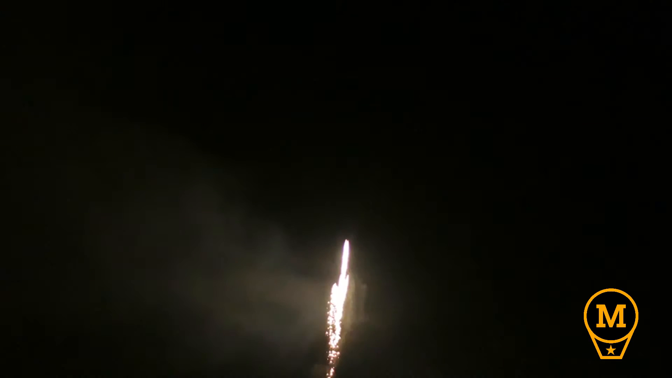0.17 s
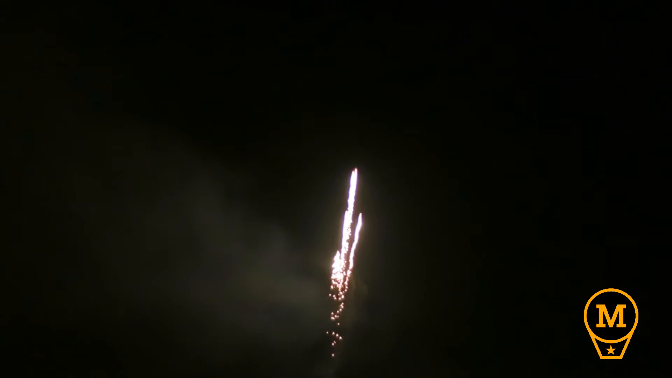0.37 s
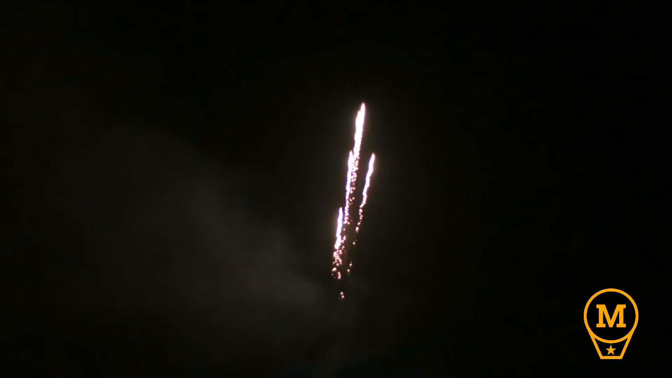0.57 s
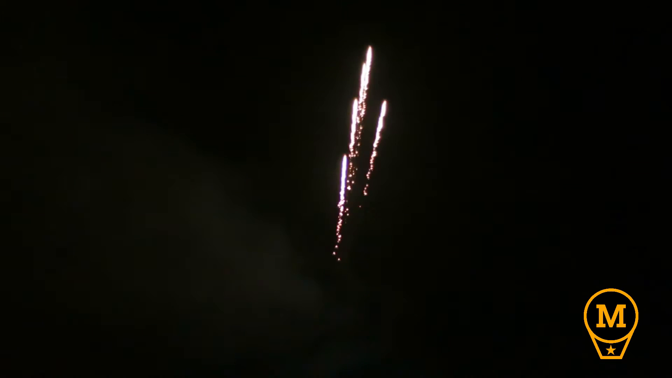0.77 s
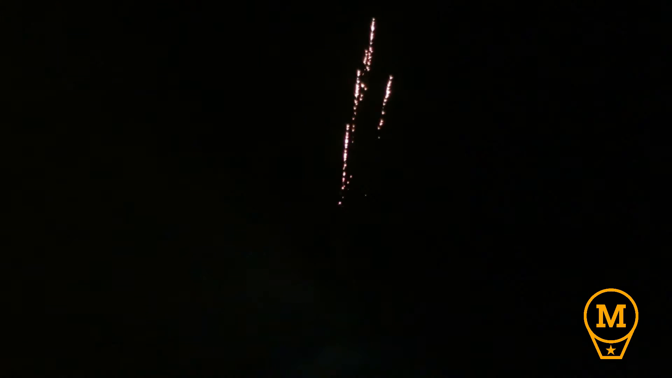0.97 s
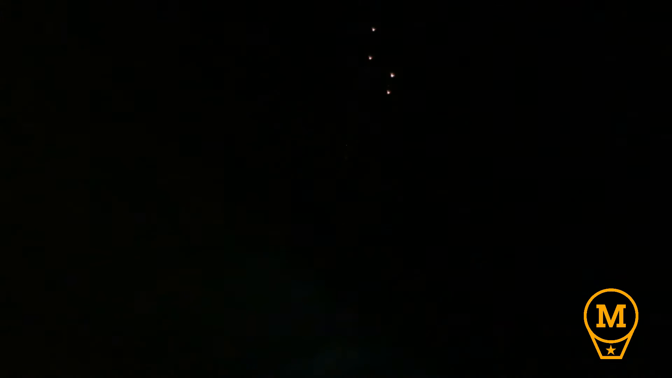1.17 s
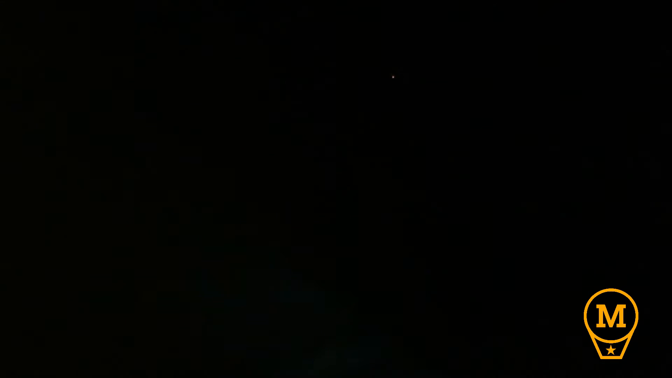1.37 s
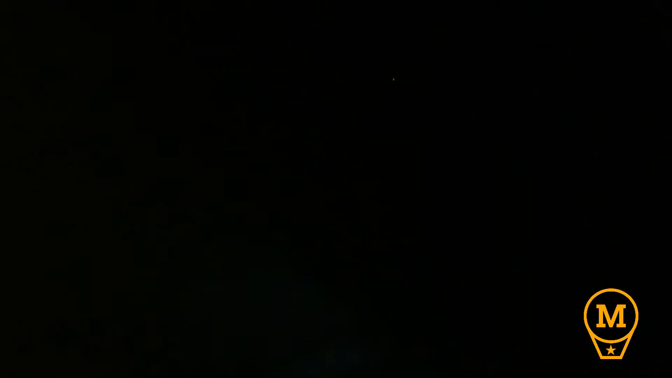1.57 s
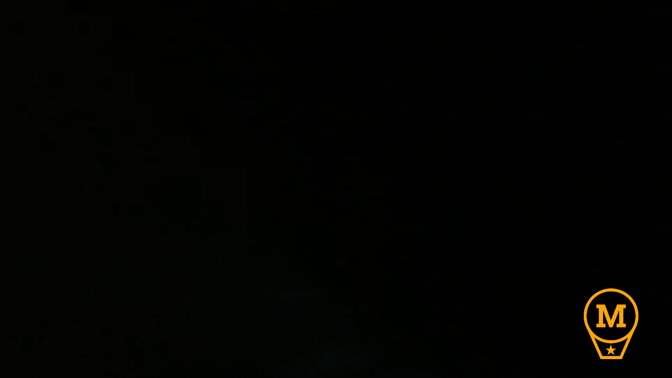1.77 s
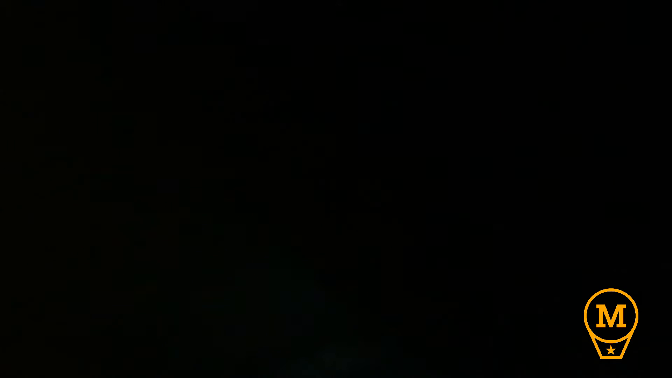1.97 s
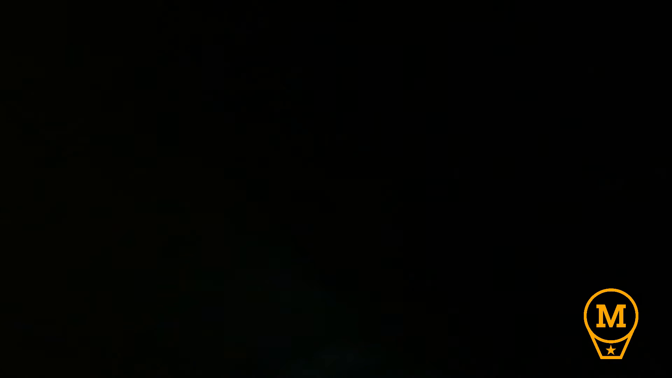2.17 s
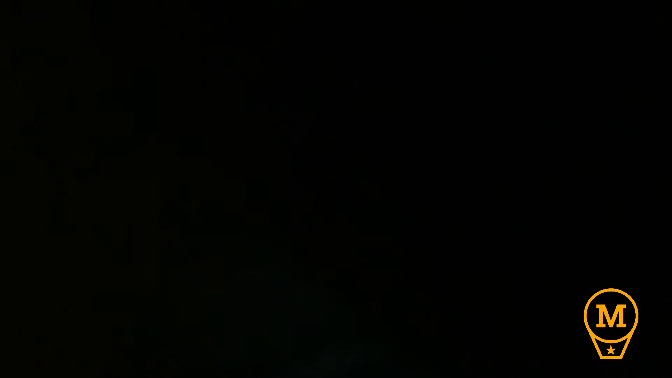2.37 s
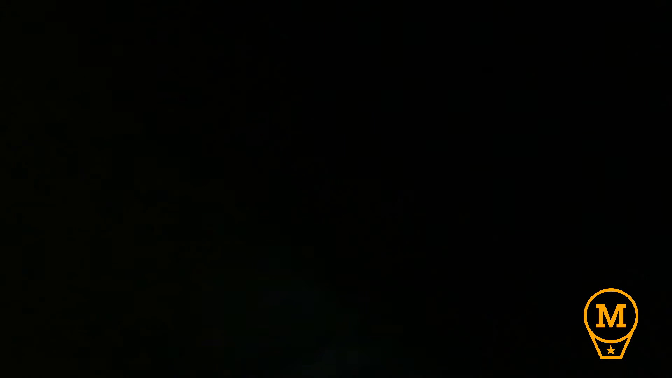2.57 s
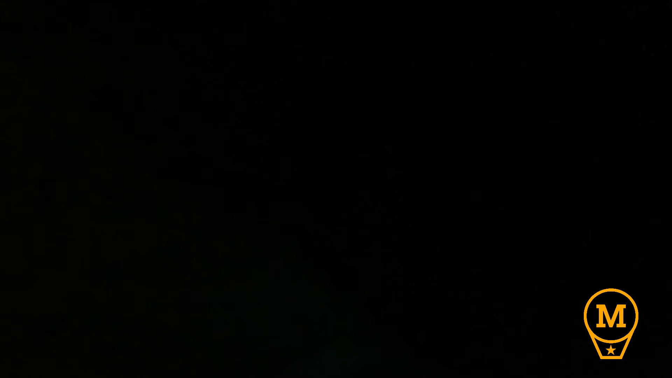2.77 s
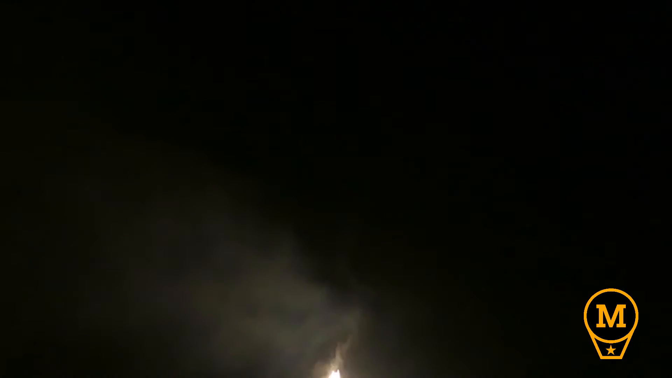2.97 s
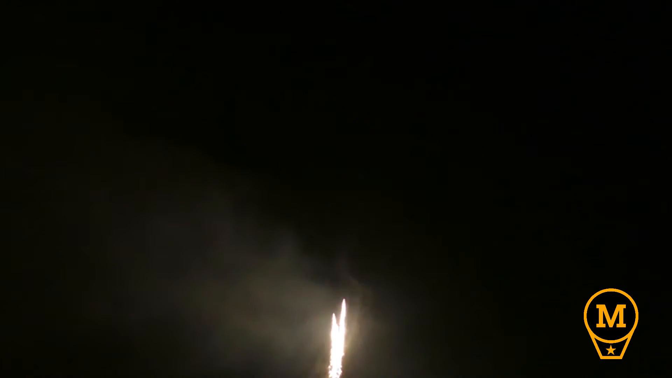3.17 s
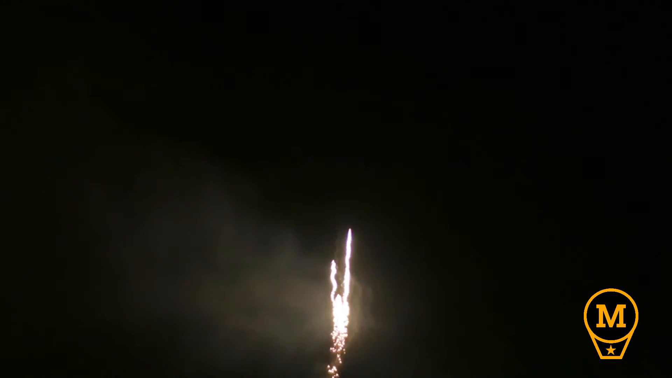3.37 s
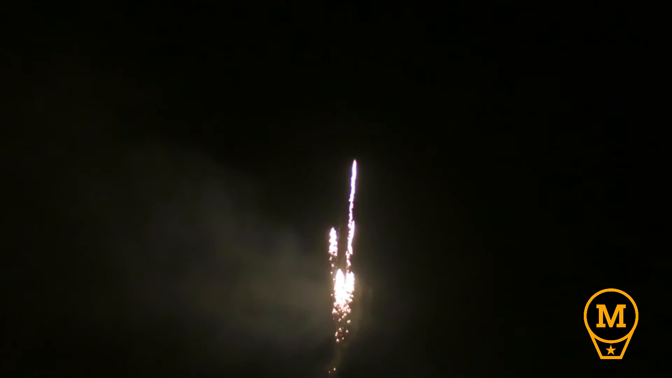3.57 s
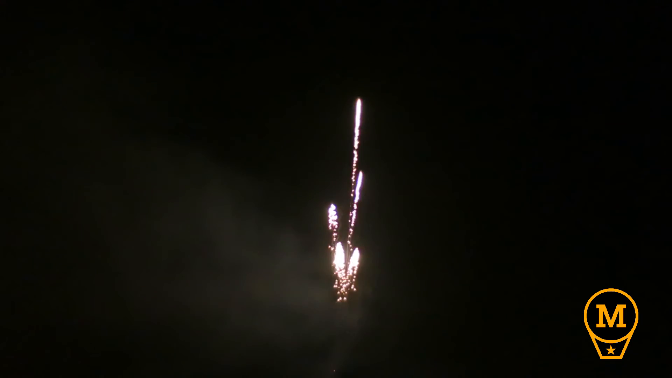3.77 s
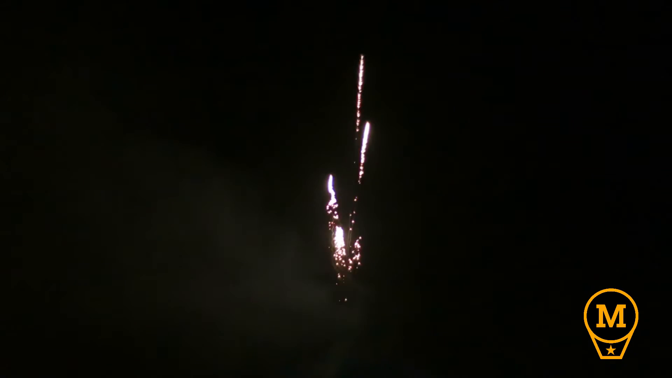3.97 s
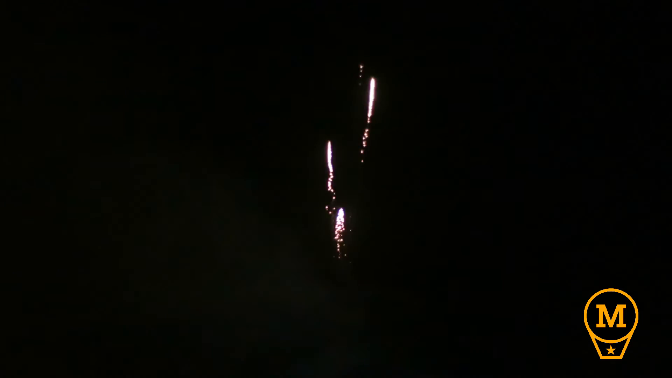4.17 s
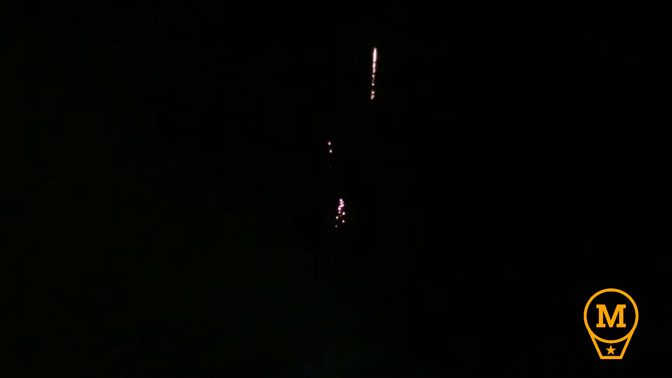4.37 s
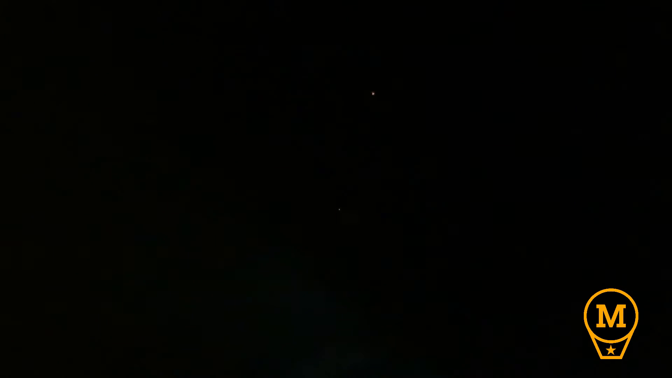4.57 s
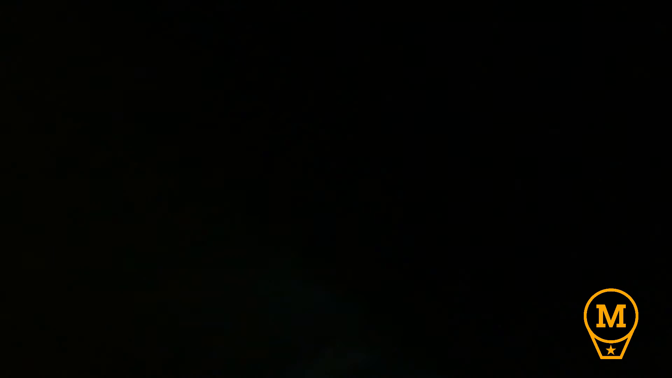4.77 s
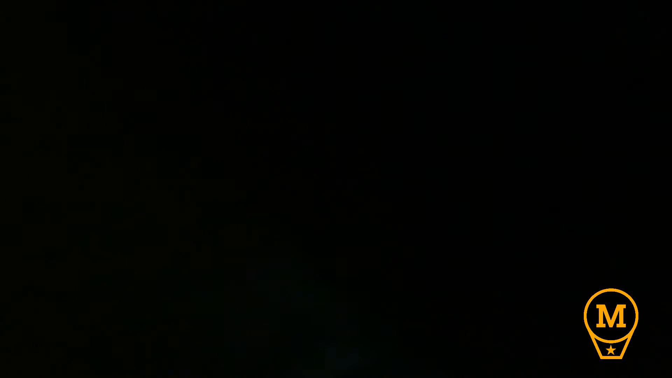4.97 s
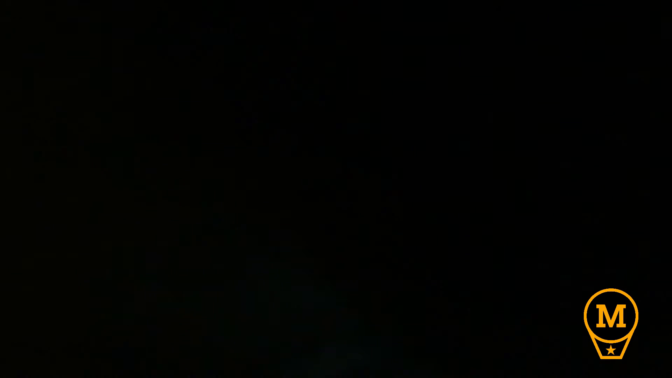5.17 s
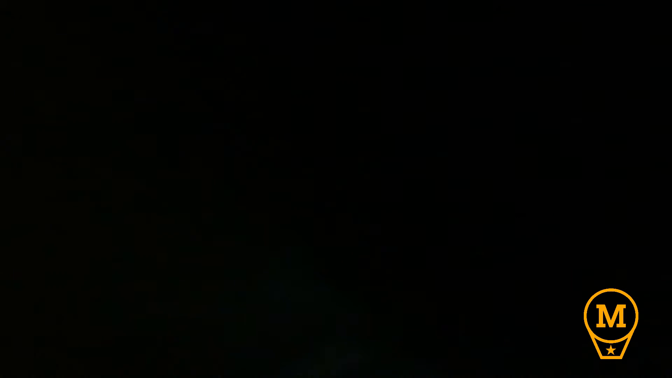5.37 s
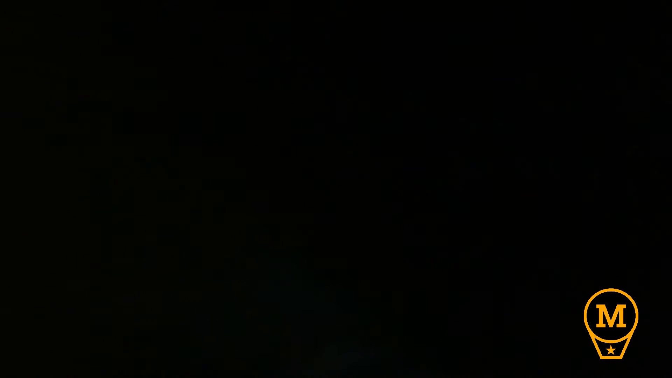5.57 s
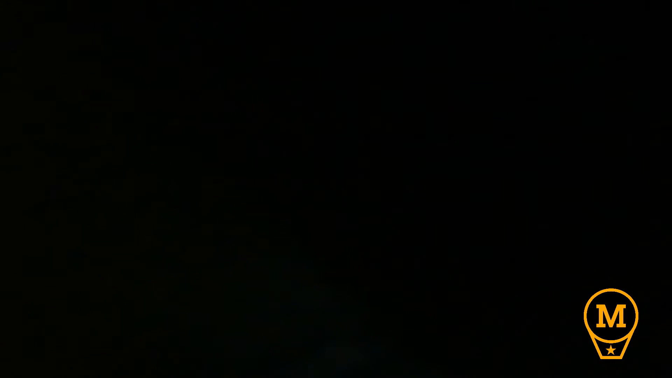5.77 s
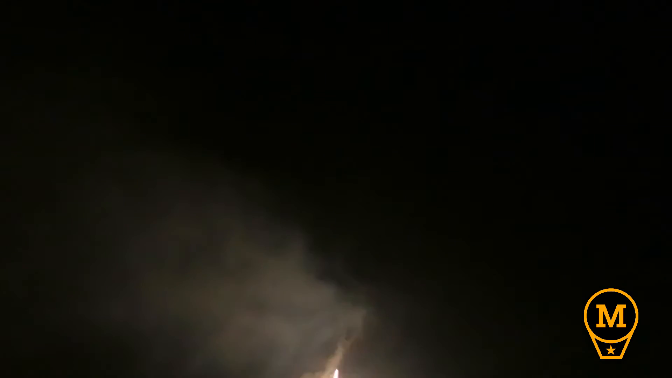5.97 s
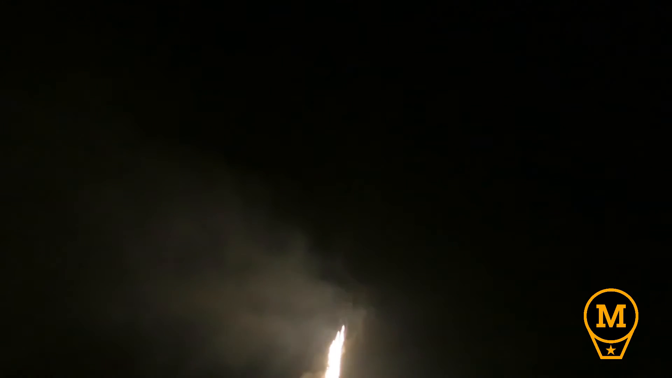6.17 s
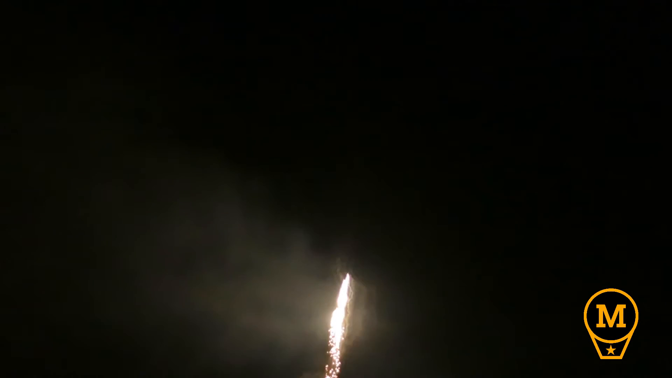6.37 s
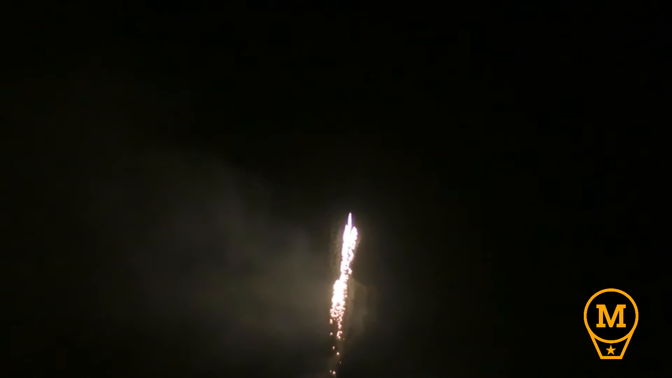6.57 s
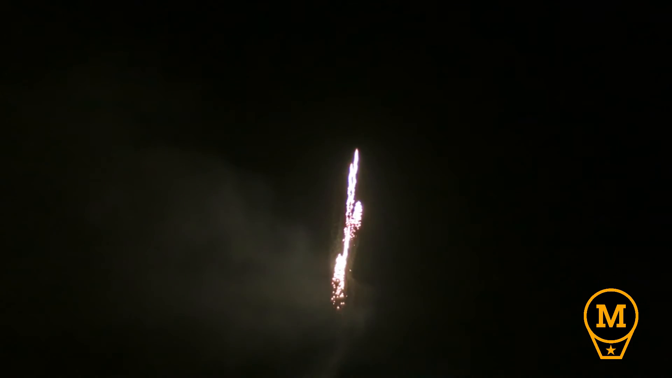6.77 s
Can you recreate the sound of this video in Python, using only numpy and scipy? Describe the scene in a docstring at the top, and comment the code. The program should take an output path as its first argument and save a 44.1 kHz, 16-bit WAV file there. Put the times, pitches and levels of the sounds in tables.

```python
"""Night fireworks: a town rumbles under a thin whine near 15.7 kHz, and far salutes thud and come back off a
wall. Three launches follow, about three seconds apart: shaped-noise blasts pop from a tube, then whistling
stars, built from spinning tones and hiss, climb away. Near walls slap back, houses hold the whistle's echo, and
the first two launches get a late knock off a slope; the background dips at each and slowly swells back. Small
ticks come in between; near the end a faint low sine climbs into a blip."""
import sys
import numpy as np
from scipy import signal
from scipy.fft import rfft, irfft
from scipy.io import wavfile
from scipy.ndimage import uniform_filter1d

SR = 44100
rng = np.random.default_rng(int(sys.argv[2]) if len(sys.argv) > 2 else 0)


def file_out(sig):
    """Save sig as 16-bit WAV at sys.argv[1]."""
    # one column per channel
    cols = np.atleast_2d(sig).T
    # limit, then scale
    lim = np.clip(cols, -1, 1)
    pcm = np.round(lim * 32767).astype(np.int16)
    wavfile.write(sys.argv[1], SR, pcm)


N = 300028
T = np.arange(N) / SR
LEFT_RIGHT = np.array([[1], [-1]])  # sends a side signal to left and, inverted, to right

# Colour of the town rumble: (frequency [Hz], relative level [dB])
TOWN_COLOUR = [(15, -39), (25, -18), (52, -8.5), (72, 2), (90, -7.5), (150, -9), (230, -9.5), (400, -14),
               (531, -20), (887, -19), (1100, -24.5), (2480, -31), (4000, -37.5), (8000, -44),
               (14800, -51.5), (18000, -53)]
# Background dip at each launch: (time [s], depth before the return sets in [dB], swell-back time constant [s])
LAUNCH_DIPS = [(.17, -17.5, 1.27), (3.2, -10.5, 1.72), (6.33, -13, 1.1)]
# Far salutes: (time [s], level [dB], pitch [Hz])
SALUTES = [(0.0707, -5, 322), (0.362, -25, 314), (3.122, -5, 300), (4.351, -12, 282), (5.524, -7, 283),
           (6.546, -22.5, 287)]
# Colour of the rough wall's return: (frequency [Hz], relative level [dB])
WALL_COLOUR = [(100, 6.5), (350, 0), (900, -5), (4000, -9)]
# Launch blasts, several per launch: (time [s], push level [dB], crack re push [dB], rattle re push [dB])
LAUNCH_BLASTS = [(0.1668, -9.5, 0, -12.5), (0.1696, 3.5, -17, -23.5), (0.1737, 2, -20, -25),
                 (.175, 1.5, 1.5, -20.5), (0.1811, -13, 8, -14), (3.213, -8, 3, -13.5),
                 (3.2156, 3, -3.5, -11), (3.222, -5.5, 5, -25), (3.245, -24, 1, -12.5),
                 (6.32, 2.5, -2.5, -14.5), (6.334, -13, 2.5, -10), (6.336, -9, -3.5, -3)]
# Colour of a blast's low push: (frequency [Hz], relative level [dB])
PUSH_COLOUR = [(35, -54), (60, -6.5), (300, 3.5), (750, 0.5), (1000, -3), (1580, -20.5), (2050, -16),
               (4400, -24), (16000, -71)]
# Colour of a blast's sharp crack: (frequency [Hz], relative level [dB])
CRACK_COLOUR = [(600, -20.5), (1600, 1), (2050, -8.5), (3500, 1.5), (4420, -8), (7940, -18.5), (13000, -30),
                (16000, -106)]
# Whistling stars: (lit [s], turn [s], out [s], pitch when lit [Hz], pitch at the turn [Hz], pitch when out [Hz],
# time constant of the first drop [s], sag [Hz/s], level at the turn [dB], growth [dB/s], spin [turns/s],
# spin depth [Hz], half-pitch tone [dB], overtone trim [dB], left minus right [dB])
WHISTLING_STARS = [(.192, 1.07, 1.413, 4520, 3032, 3327, 0.054, 880, -23, 4.5, 32.6, 33, -24.5, 2, -1),
                   (.24, .5, .64, 3800, 3247, 3040, .05, 1300, -29.5, -2, 28, 80, -22, -1, -1),
                   (.58, 1.1, 1.28, 3590, 3630, 3660, .07, -250, -25.5, 7, 21, 20, -21, 3, -1.5),
                   (.6, 1.08, 1.3, 3557, 3190, 3357, 0.074, 603, -23.5, 3.5, 29.4, 13.5, -44, 8.5, 0),
                   (3.232, 4.43, 4.8, 4406, 2970, 3273, .12, 690, -17, 5.5, 27.7, 38.5, -18.5, -3, -0.8),
                   (3.26, 4.1, 4.24, 3742, 2810, 2805, 0.096, 580, -19.5, 4, 23.8, 53, -27, -4.5, -0.5),
                   (3.28, 4.07, 4.38, 4250, 3313, 3710, .07, 800.5, -24.5, 8, 31.5, 33, -41, 4, -.5),
                   (3.3, 4.05, 4.37, 3780, 3114, 3356, .07, 620, -19.5, 8, 33, 36, -37, 3, -1),
                   (4.26, 4.4, 4.75, 3180, 3061, 3370, 0.0664, 697, -19.5, 3, 29.77, 7.2, -42, -3.5, -1),
                   (6.332, 6.9, 7.2, 4466, 3486, 3700, 0.041, 299, -19, 1.5, 27.3, 26, -38, -1.5, -0.5),
                   (6.35, 6.9, 7.2, 3782, 2994, 3200, .06, 721.5, -20, -1, 35.6, 54, -28.5, -0.5, -1),
                   (6.38, 6.9, 7.2, 4266, 3146, 3300, 0.073, 1500, -20, 16, 28, 19, -35, 6.5, -1)]
# Flame sputters, where pitch jumps up and slides back; star row number from 0: (time [s], jump [Hz])
FLAME_SPUTTERS = {2: [(.655, 397), (.805, 354), (.905, 199)], 6: [(3.508, 349), (3.8, 196), (3.838, 197)],
                  11: [(6.665, 397)]}
# Overtones of the whistle: (multiple of the pitch, level before trim [dB])
WHISTLE_OVERTONES = [(2, -19), (3, -22), (4, -37.5)]
# Colour of the flame's hiss: (frequency [Hz], relative level [dB])
HISS_COLOUR = [(700, -10.5), (2200, -4), (3400, 16.5), (4500, -6.0), (6500, -7), (11000, -8.5), (15000, -27)]
# Slap-backs of the blasts off near walls: (time [s], nominal level [dB], centre [Hz])
WALL_SLAPS = [(.209, -21, 1100), (.216, -14, 2150), (.25, -20.5, 330), (.27, -23, 1830), (.281, -21, 292),
              (3.257, -14, 1980), (3.28, -23, 1500), (3.325, -22, 503), (6.345, -28, 400),
              (6.355, -23, 1000), (6.37, -10, 1910), (6.43, -19, 496)]
# Short ticks between launches: (time [s], nominal level [dB], centre [Hz])
SHORT_TICKS = [(1.145, -35, 1360), (2.345, -47, 5900), (2.497, -41, 6040)]
# Faint climbing tone with a blip at its end: (time [s], pitch [Hz], level [dB])
CLIMBING_TONE = [(5.841, 284, -41), (5.899, 296, -39), (6.019, 332, -38.5), (6.151, 366, -42),
                 (6.21, 391, -56), (6.25, 388, -26), (6.29, 350, -40)]

# A far slope returns a launch as a soft knock: delay [s], nominal level [dB], centre [Hz]
SLOPE_S, SLOPE_DB, SLOPE_HZ = 1.88, -36.5, 2090


def undb(db):
    """Decibels to gain."""
    return 10 ** (np.asarray(db) / 20)


def unit(x):
    """Scale to rms 1."""
    return x / np.sqrt(np.mean(x ** 2))


def gains(points, size):
    """Gain at each FFT bin of a colour given as (frequency [Hz], level [dB])."""
    hz, db = np.transpose(points)
    bins_hz = np.fft.rfftfreq(size, 1 / SR)
    return undb(np.interp(np.log(bins_hz + 1), np.log(hz), db))


def noise(points, size=N):
    """Coloured noise of rms 1."""
    spectrum = rfft(rng.standard_normal(size)) * gains(points, size)
    return unit(irfft(spectrum, size))


def causal(points, size=2048):
    """Minimum-phase pulse with this colour, peak 1, built by folding the cepstrum."""
    cepstrum = irfft(np.log(gains(points, size)))
    cepstrum[1:size // 2] *= 2
    cepstrum[size // 2 + 1:] = 0
    pulse = irfft(np.exp(rfft(cepstrum)))
    return pulse / np.abs(pulse).max()


def walk(rate, size=N):
    """Random modulator of rms 1: levels held 1 / rate seconds, then slewed twice."""
    hold = max(int(SR / rate), 1)
    steps = np.repeat(rng.standard_normal(size // hold + 1), hold)
    slewed = uniform_filter1d(uniform_filter1d(steps, hold), hold)
    return unit(slewed[:size])


def add(out, s, x):
    """Mix x in at time s."""
    i = int(s * SR)
    out[..., i:i + x.shape[-1]] += x[..., :N - i]


def town():
    """Octave bands of rumble flicker alone, wider in the treble, under a thin steady-pitched pulsing whine."""
    rumble, colour = 0, gains(TOWN_COLOUR, N)
    octave = np.log2(np.fft.rfftfreq(N, 1 / SR) + 1)
    for centre in np.arange(4, 15):
        band = colour * np.cos(np.pi / 2 * np.clip(octave - centre, -1, 1))
        mid, side = irfft(rfft(rng.standard_normal((2, N))) * band, N)
        width = np.interp(centre, [5, 9, 13], [.12, .13, .5])
        flicker_db = np.interp(centre, [7, 11], [1.6, .7]) * (.6 * walk(3) + walk(14))
        rumble = rumble + undb(flicker_db) * (mid + width * side * LEFT_RIGHT)
    # a steady pitch near 15.7 kHz, its level pulsing 11 times a second
    pulse = 1 + .8 * np.sin(2 * np.pi * 11.1 * T)
    whine = np.sin(2 * np.pi * 15735 * T) * pulse
    return undb(2.5) * unit(rumble) + undb(-34) * whine


def swell(rest_db=-34, dip_s=0.14, swell_power=1.18):
    """Gain of the background: a quick dip at each launch, a slow return."""
    db = rest_db
    for s, depth_db, back_s in LAUNCH_DIPS:
        age = np.maximum(T - s, 0)
        fall = 1 - np.exp(-(age / dip_s) ** 2)
        db = db + depth_db * fall * np.exp(-(age / back_s) ** swell_power)
    return undb(db)


def thuds():
    """Distance leaves two rounded cycles with a slight edge, scattered copies and one echo off a rough wall."""
    out, t = np.zeros(N), np.arange(-400, 400) / SR
    for s, db, hz in SALUTES:
        edge = 0.16 * np.exp(-((t + 0.0019) / 0.00099) ** 2) * np.sin(2 * np.pi * 2.66 * hz * t)
        cycles = np.exp(-(t / 0.0022) ** 2) * np.cos(2 * np.pi * hz * t)
        add(out, s - 400 / SR, undb(db) * (edge - cycles))
    decay = np.exp(-np.arange(4000) / SR / 0.03)
    mid, side = rng.standard_normal((2, 4000)) * decay * undb(-36.0)
    scatter = mid + 0.33 * side * LEFT_RIGHT
    near = out + signal.fftconvolve(out[None], scatter, axes=1)[:, :N]
    return near + wall(near)


def wall(x, delay_s=.107, level_db=-8.5):
    """One rough wall sends bangs back later, smeared over some 20 ms and duller."""
    smear = noise(WALL_COLOUR, 1500) * np.exp(-np.arange(1500) / SR / 0.0039)
    # the return level holds near 300 Hz
    response = np.abs(signal.freqz(smear, 1, [240, 300, 360], fs=SR)[1])
    smear = smear / np.sqrt(np.mean(response ** 2))
    out = np.zeros_like(x)
    add(out, delay_s, undb(level_db) * signal.fftconvolve(x, [smear], axes=1)[:, :N])
    return out


def pops():
    """Each blast is a low push and a sharp crack, with a rattle of reflections behind."""
    out, push, crack = np.zeros((2, N)), -causal(PUSH_COLOUR), causal(CRACK_COLOUR)
    size = 12000
    t = np.arange(size) / SR
    fade = np.exp(-t / 0.0033) + undb(-14.0) * np.exp(-t / 0.066)
    for s, db, crack_db, tail_db in LAUNCH_BLASTS:
        low, low_side = noise(PUSH_COLOUR, size), noise(PUSH_COLOUR, size)
        high, high_side = noise(CRACK_COLOUR, size), noise(CRACK_COLOUR, size)
        crack_gain = undb(crack_db)
        mid = low + crack_gain * 0.9 * high
        side = 0.095 * low_side + crack_gain * 0.33 * high_side
        rattle = mid + side * LEFT_RIGHT
        add(out, s, undb(db) * (push + crack_gain * crack))
        add(out, s, undb(db + tail_db + 2.8 * walk(140.6, size)) * fade * rattle)
    return out


def burn(t, lit_s, turn_s, out_s, lit_hz, turn_hz, out_hz, drop_s, sag, db, growth,
         catch_s=.05, catch_db=-12, dying_db=-40.5, dying_power=3.12):
    """Pitch drops fast, sags as the tube empties and bends at the end; the tone catches, grows, then dies."""
    before = np.maximum(turn_s - t, 0)
    dying = np.clip((t - turn_s) / (out_s - turn_s), 0, 1)
    drop_hz = lit_hz - turn_hz - sag * (turn_s - lit_s)
    hz = turn_hz + sag * before + drop_hz * np.exp((lit_s - t) / drop_s) + (out_hz - turn_hz) * dying
    catch = catch_db * np.exp((lit_s - t) / catch_s)
    return hz, db - growth * before + catch + dying_db * dying ** dying_power


def star(row, sputters, hiss_db=-16.5, air_db_per_s=7, flutter_db=3, waver_db=1.03,
         slide_s=.016, jitter_hz=22, start_hz=180, settle_s=.14, drift_hz=5):
    """Burning powder sings in its tube; spin wobbles pitch and level, the flame hisses around the tone."""
    lit_s, out_s = row[0], row[2]
    turns, depth_hz, half_db, over_db, pan_db = row[10:]
    t = np.arange(lit_s * SR, min(out_s * SR, N)) / SR
    size = len(t)
    hz, db = burn(t, *row[:10])
    # age counts from the latest blast before the star lights
    age = t - max(blast[0] for blast in LAUNCH_BLASTS if blast[0] < lit_s)
    # the higher the star climbs, the more treble the air takes
    dull_db = -air_db_per_s * age
    spin = 2 * np.pi * np.cumsum(turns * (1 + 0.1207 * walk(9, size))) / SR
    # the flame is ragged when lit and steadies as it burns down
    ragged = (jitter_hz + start_hz * np.exp(-age / settle_s)) * walk(520, size)
    pitch = hz + depth_hz * np.sin(spin) + ragged + drift_hz * walk(24.75, size)
    for at, jump_hz in sputters:
        pitch = pitch + jump_hz * (t > at) * np.exp(-np.abs(t - at) / slide_s)
    phase = 2 * np.pi * np.cumsum(pitch) / SR
    tone = np.sin(phase) * undb(flutter_db * walk(200, size) + depth_hz / 40 * np.cos(spin))
    over = 0
    for k, level_db in WHISTLE_OVERTONES:
        partial_db = level_db + over_db + (k - 2) / 3 * dull_db + 3.16 * walk(250, size)
        over = over + undb(partial_db) * np.sin(k * phase)
    # around 0.4 s into the climb every second cycle is weaker: tones at .5, 1.5 and 2.5 times the pitch
    half_gain = undb(half_db) * (0.82 + 0.7 * walk(400, size)) * np.exp(-((age - .4) / 0.41) ** 2)
    half = half_gain * (.5 * np.sin(phase / 2) + np.sin(3 * phase / 2) + 0.38 * np.sin(5 * phase / 2))
    hiss_gain = undb(hiss_db + dull_db)
    mid = unit(tone) / np.sqrt(2) + over + half + hiss_gain * noise(HISS_COLOUR, size)
    # left and right differ a little, each part in its own way
    side = 0.093 * np.cos(phase + 1.9 * walk(39.8, size))
    side = side + 0.3 * walk(60.14, size) * (over + half)
    side = side + 0.062 * hiss_gain * noise(HISS_COLOUR, size)
    edges = np.clip(np.minimum(t - lit_s, out_s - t) / 0.007, 0, 1)
    level = undb(db + waver_db * walk(12.66, size)) * np.sqrt(2) * edges
    return level * (mid + side * LEFT_RIGHT) * undb(pan_db * LEFT_RIGHT / 2)


def houses(x, near_db=-20, near_t60=0.55, wide=0.65,
           far_db=-28.5, far_t60=3.9, hill_s=SLOPE_S, hill_spread_s=.2, hill_db=-18.5, blur=.9):
    """Near fronts give a short tail, the far town a long dull one, with a late smeared return off a slope."""
    t, out = np.arange(int(3.4 * SR)) / SR, 0
    # restless air blurs what comes back
    x = x * (1 + blur * walk(350)) / np.hypot(1, blur)
    late = undb(hill_db) * np.exp(-((t - hill_s) / hill_spread_s) ** 2)
    for db, t60, top_hz, extra in ((near_db, near_t60, 6000, 0), (far_db, far_t60, 3800, late)):
        colour = [(300, -6), (2900, -5), (top_hz, 0), (2 * top_hz, -24)]
        mid, side = noise(colour, len(t)), noise(colour, len(t))
        shape = 1000. ** (-t / t60) * np.minimum(t / 0.009, 1) + extra
        echo = (mid + wide * side * LEFT_RIGHT) * shape / np.sqrt(np.sum(shape ** 2))
        out = out + undb(db) * signal.fftconvolve(x.mean(0)[None], echo, axes=1)[:, :N]
    return out


def bursts(rows, decay_s):
    """Slaps, ticks and knocks: short decaying noise around a centre, partly shared by both sides."""
    out, t = np.zeros((2, N)), np.arange(2000) / SR
    shape = np.minimum(t / .001, 1) * np.exp(-t / decay_s)
    for s, db, hz in rows:
        colour = [(hz / 8, -50), (hz / 0.99, 0), (hz * 1.25, 0), (hz * 3, -50)]
        burst = np.array([noise(colour, 2000) for _ in range(2)])
        add(out, s, undb(db) / 2 * (burst[0] + 0.38 * burst) * shape)
    return out


def hum():
    """A sine that follows the climbing pitch, wavering in pitch and level."""
    s, hz, db = np.transpose(CLIMBING_TONE)
    pitch = np.interp(T, s, hz) + 6 * walk(30)
    tone = np.sin(2 * np.pi * np.cumsum(pitch) / SR)
    return np.sqrt(2) * tone * undb(np.interp(T, s, db, -120, -120) + 2 * walk(27))


def scene():
    """Stars and bangs, with town and echoes on the slow swell of the background."""
    back = swell()
    stars = np.zeros((2, N))
    for k, row in enumerate(WHISTLING_STARS):
        add(stars, row[0], star(row, FLAME_SPUTTERS.get(k, [])))
    # the slope answers the first two launches
    knocks = [(s + SLOPE_S, SLOPE_DB, SLOPE_HZ) for s, *_ in LAUNCH_DIPS[:2]]
    bangs = thuds() + pops() + bursts(WALL_SLAPS, 0.0042) + bursts(SHORT_TICKS + knocks, 0.022)
    # an echo that outlasts the dip comes up with the swell
    return stars + bangs + hum() + back * (town() + houses(stars / back))


def record(dry):
    """The loudest blasts clip and a steep low-pass at 15950 Hz cuts the top."""
    top_cut = signal.ellip(10, .2, 70, 15950, fs=SR, output="sos")
    return np.clip(signal.sosfilt(top_cut, np.clip(dry, -1, 1)), -1, 1)


dry = scene()
out = record(dry)
file_out(out)
```